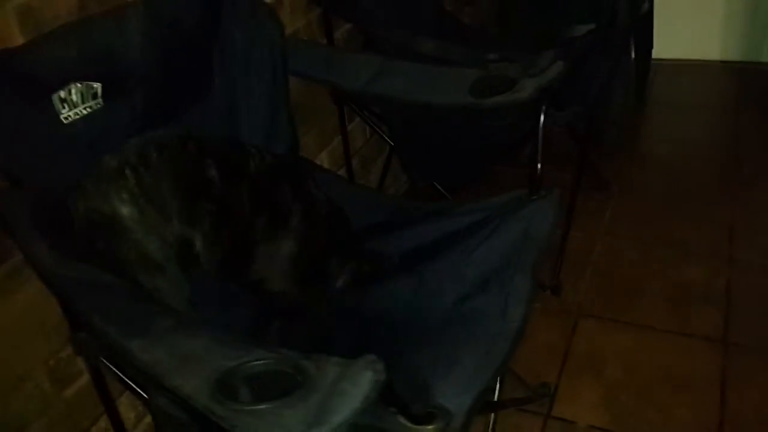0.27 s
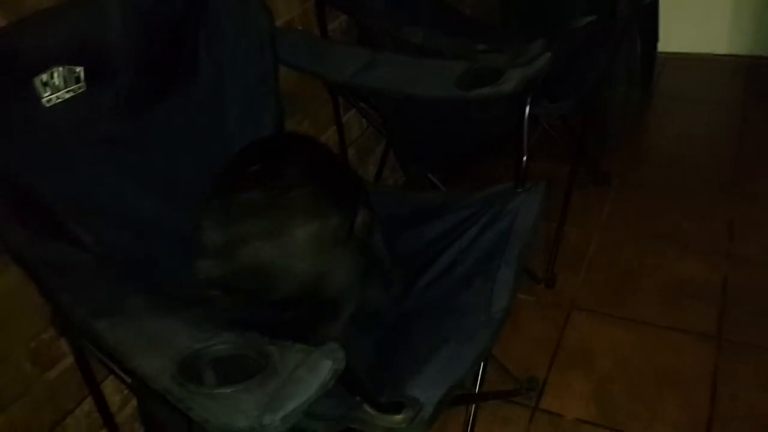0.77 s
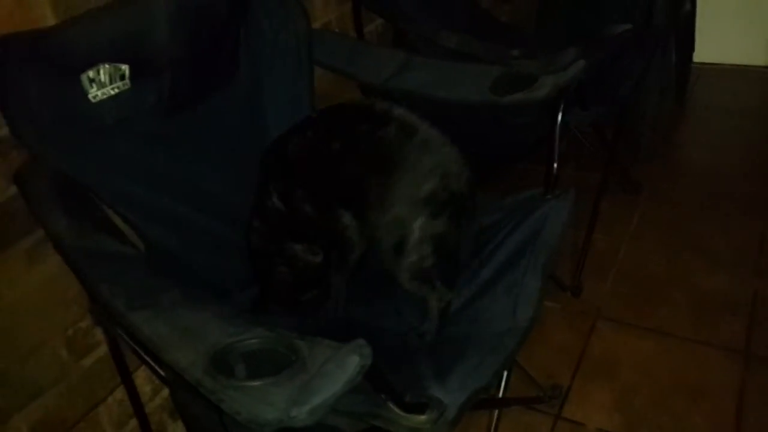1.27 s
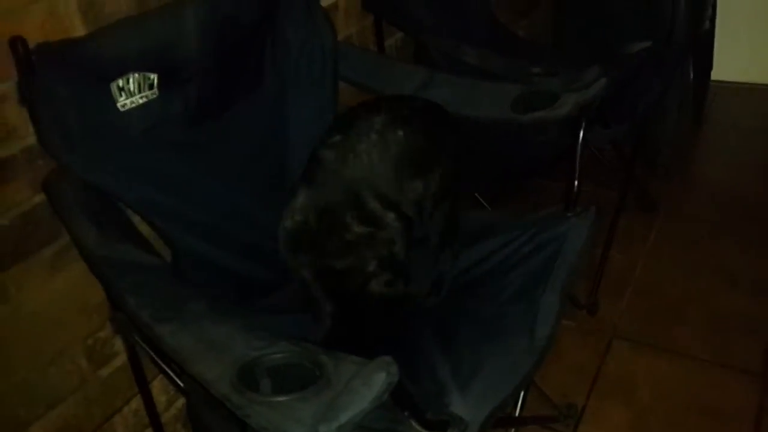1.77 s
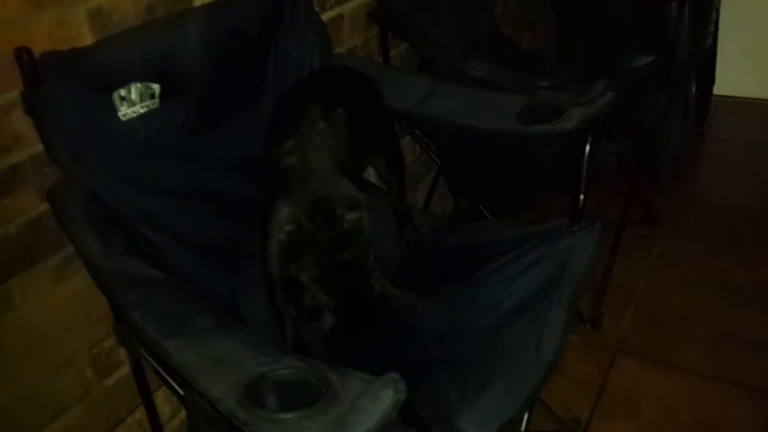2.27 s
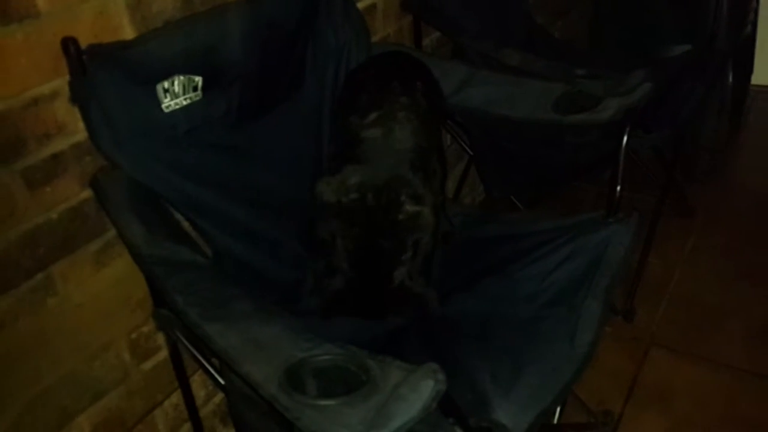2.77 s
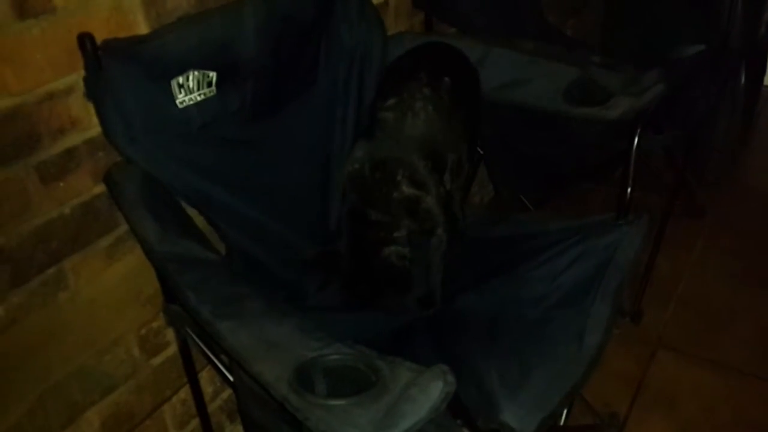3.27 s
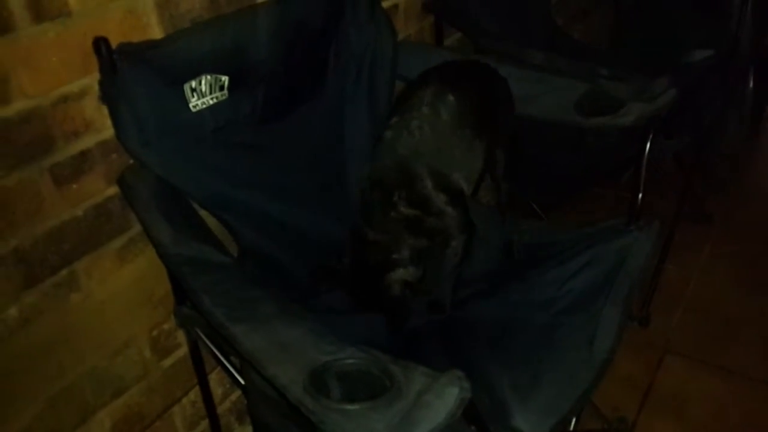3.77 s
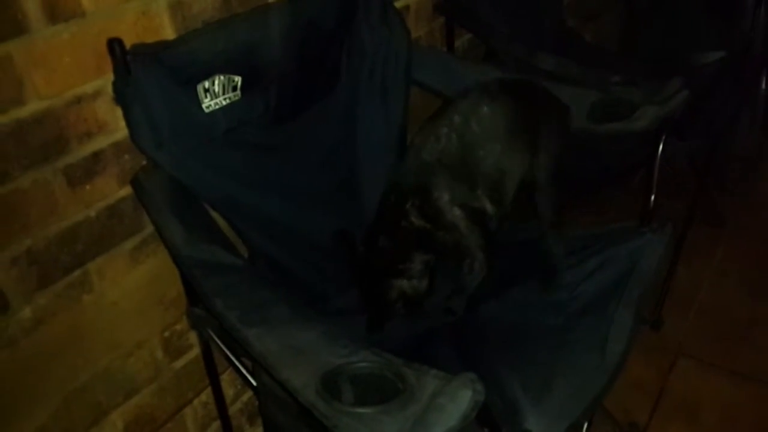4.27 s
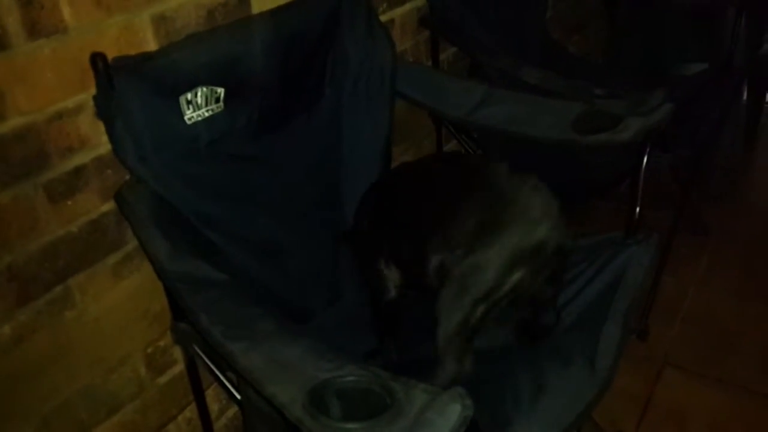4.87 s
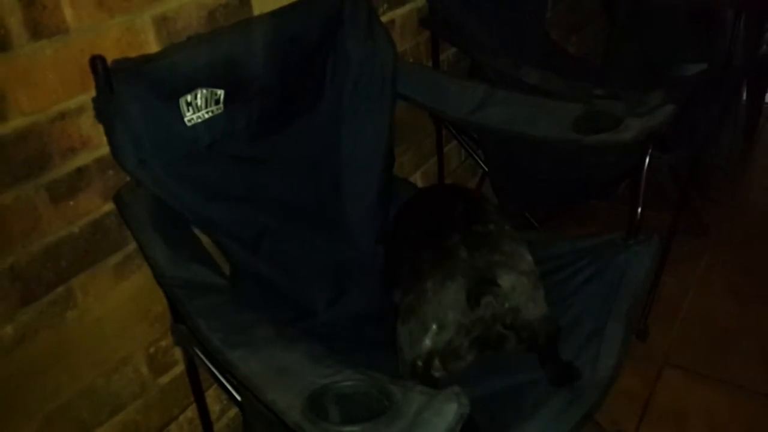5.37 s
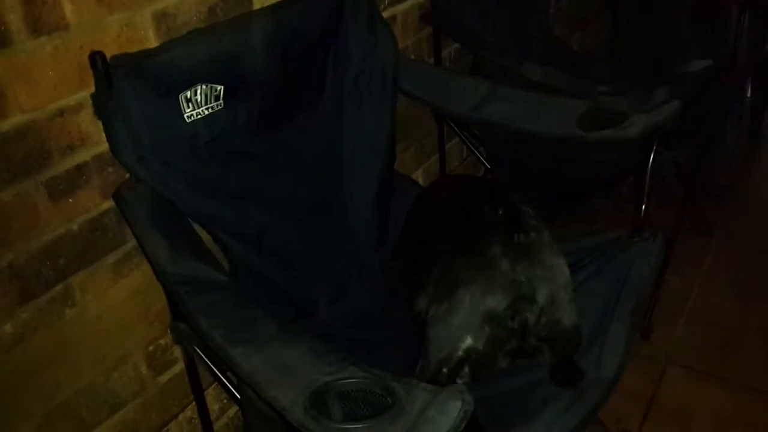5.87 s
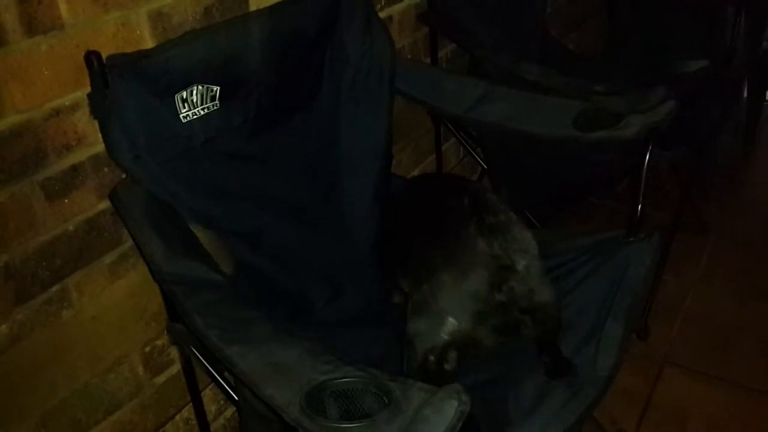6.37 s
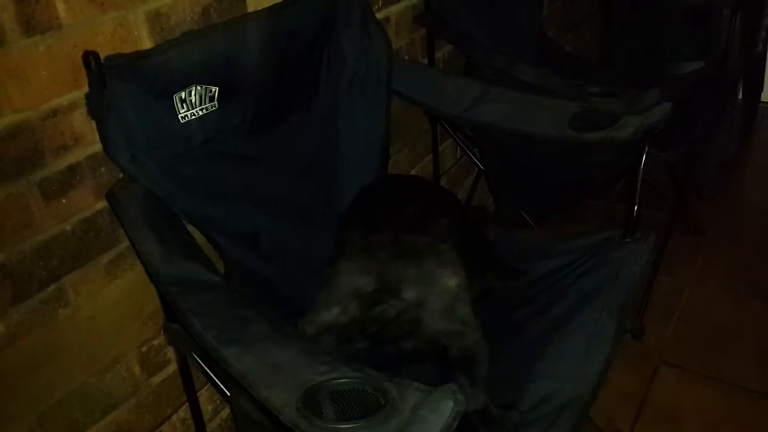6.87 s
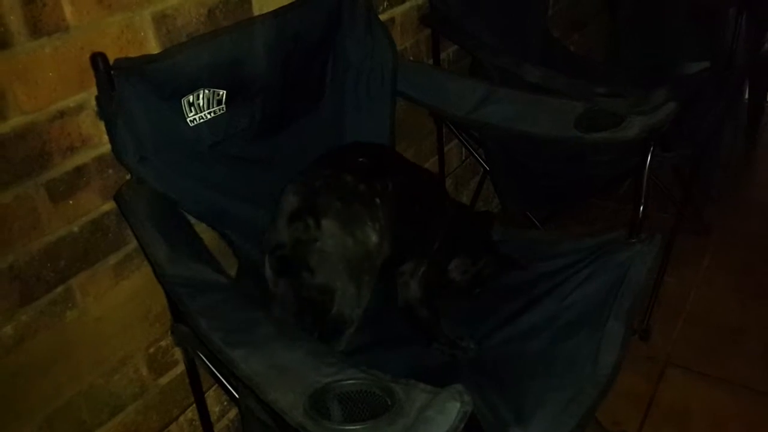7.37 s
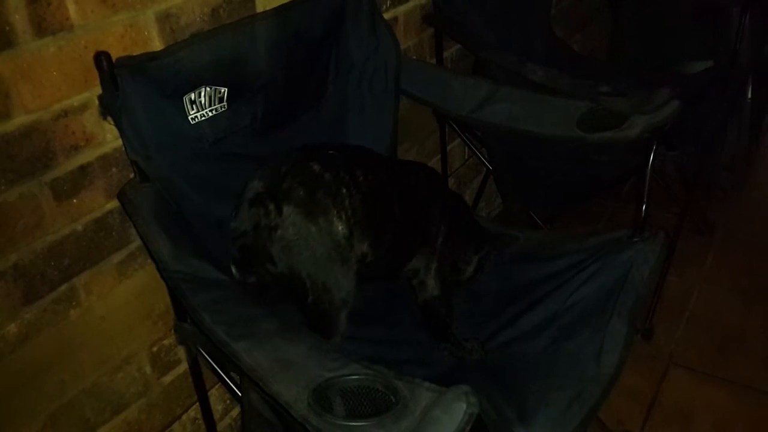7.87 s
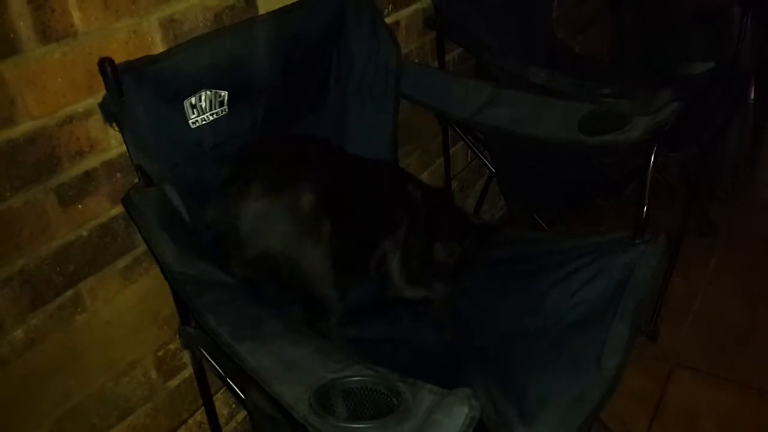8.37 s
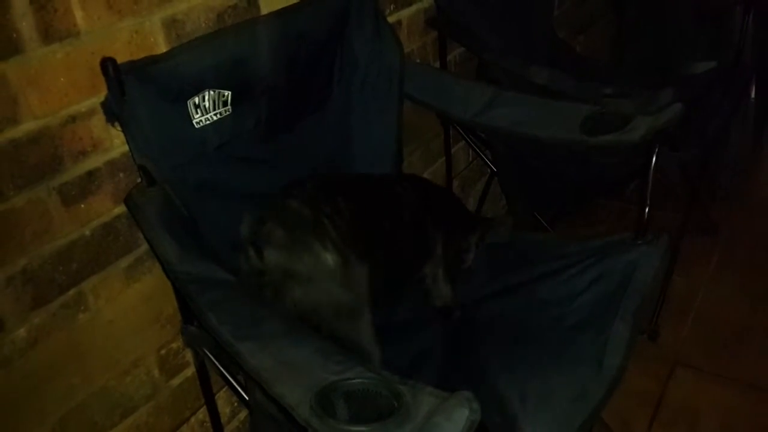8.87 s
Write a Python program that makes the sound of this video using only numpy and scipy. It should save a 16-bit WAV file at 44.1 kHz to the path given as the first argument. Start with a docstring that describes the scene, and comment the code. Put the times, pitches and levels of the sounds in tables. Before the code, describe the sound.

Close by in a quiet room, a small dog paws unevenly at a folding chair's taut nylon seat, snorting and sneezing between strokes. The cloth rustles, the seat thuds softly and claws catch with sharp ticks. Then comes a run of fast scratches that zip across the weave, a few looser scrapes and knocks, and a last short burst of zipping digs.

```python
"""Paws hiss over taut nylon: a small dog digs at a folding chair's seat, close to the microphone in a
tiled room. The panel rasps and the seat thuds like a slack drum under each push. Fast claws zip across
the weave, snag and tick, and between strokes the dog snorts and sneezes through its short muzzle.
The tiles add a brief echo to claws, taps and snorts; faint room tone lies behind."""
import sys
import numpy as np
from scipy import signal
from scipy.fft import rfft, irfft, next_fast_len
from scipy.io import wavfile
from scipy.ndimage import uniform_filter1d, map_coordinates

SR = 44100
rng = np.random.default_rng(int(sys.argv[2]) if len(sys.argv) > 2 else 0)


def inscribe(sig):
    """Save sig as 16-bit PCM at rate SR to the path in sys.argv[1].

    A 1-D sig is mono; a 2-D sig holds one channel per row.
    Samples are clipped to [-1, 1] before scaling.
    """
    pcm = np.round(np.clip(np.atleast_2d(sig).T, -1, 1) * 32767)
    wavfile.write(sys.argv[1], SR, pcm.astype(np.int16))


N = 402633

# paw strokes: (start [s], length [s], hiss of the pads [dB], push into the seat [dB])
PAW_STROKES = [(0, 0.061, -27, -50.5), (0.279, 0.092, -31.5, -37), (0.382, 0.16, -42, -43.5),
               (0.837, 0.016, -48, -47), (0.966, 0.074, -47.5, -55), (1.214, 0.019, -56.5, -56.5),
               (1.283, 0.012, -57, -55), (1.382, 0.018, -44.5, -59.5), (1.55, 0.15, -45.5, -54.5),
               (1.751, 0.089, -33, -61), (2.008, 0.057, -27.5, -33.5), (2.187, 0.078, -37, -34.5),
               (2.513, 0.12, -25.5, -29), (3.16, 0.075, -35, -53), (3.254, 0.053, -28, -42),
               (3.707, 0.084, -30.5, -55), (3.836, 0.11, -29, -47.5), (3.984, 0.071, -37, -43),
               (4.415, 0.022, -26, -35), (4.49, 0.25, -43.5, -46), (4.612, 0.26, -37, -44),
               (4.914, 0.028, -22.5, -44), (5.086, 0.14, -68, -38.5), (5.248, .12, -32.5, -52),
               (5.488, 0.022, -23.5, -31.5), (5.568, 0.082, -24.5, -38), (5.755, 0.053, -27, -35),
               (5.903, 0.056, -25.5, -52.5), (6.042, 0.098, -30.5, -41.5), (6.184, 0.075, -21.5, -36.5),
               (6.334, 0.089, -25, -31.5), (6.462, 0.085, -21.5, -34.5), (6.619, 0.083, -23, -32),
               (6.786, 0.098, -29.5, -35.5), (6.946, 0.096, -30, -51), (7.12, 0.22, -54, -48.5),
               (7.289, 0.024, -29, -44), (7.494, 0.15, -36, -55), (7.683, 0.02, -31, -40),
               (7.974, 0.11, -39.5, -45), (8.118, 0.085, -57, -43), (8.256, 0.17, -30, -44.5),
               (8.556, 0.11, -29, -29.5), (8.767, 0.058, -23, -32), (8.865, 0.064, -22.5, -30.5),
               (9.013, 0.12, -40, -35.5)]


def digging():
    """Pads hiss on the nylon, the panel rasps, and the loaded seat thuds in lumps just after."""
    # the seat shifts under the dog's weight: (time [s], rustle [dB], low creep [dB])
    weight = [(0, -39.5, -43), (.2, -57, -56), (0.799, -64, -54.5), (1.5, -55.5, -59), (1.7, -41.5, -43),
              (2.299, -45, -47), (2.95, -33, -35.5), (3.1, -34, -34.5), (3.4, -47, -51.5), (3.9, -43, -42),
              (4.17, -58.5, -58.5), (4.5, -44, -48), (6.8, -40.5, -37.5), (7.2, -52, -53),
              (7.7, -48, -44.5), (7.82, -66, -61.5), (7.93, -67, -67), (8.1, -50.5, -50.5),
              (9.13, -29, -30.5)]
    # spectra of pads, panel and seat: (frequency [Hz], density [dB])
    pads = [(1470, -24), (2500, -10.5), (3150, -14), (4690, -4.5), (7700, -7.5), (11600, -18.5),
            (15000, -30)]
    panel = [(400, -15), (700, 1.5), (1200, 1), (2200, -3), (3200, -8), (4500, -23)]
    seat = [(18, -53), (30, -29), (162, -3), (322, -7.5), (397, -5), (700, -11.5), (910, -19), (1540, -120)]
    _, _, hiss_db, push_db = np.transpose(PAW_STROKES)
    times, rustle_db, creep_db = np.transpose(weight)
    rustle, creep = (amp(np.interp(np.arange(N) / SR, times, db)) for db in (rustle_db, creep_db))
    hiss = paw_pressure(hiss_db, lag=0, rise=930, fall=605) + rustle
    rasp = paw_pressure(push_db + 2, lag=-0.0051, rise=1250, fall=620) + amp(-2) * rustle
    thud = paw_pressure(push_db - 0.5, lag=0.011, rise=650, fall=980) + creep
    smooth = patchy_noise(depth_db=2.1) * amp(2.2 * wobble(500))
    pops = crinkles()
    grainy = patchy_noise(depth_db=2.2) * amp(2 * wobble(150)) * pops
    lumpy = rng.standard_normal((2, N)) * amp(3.1 * wobble(60)) * pops
    return hiss * spread(smooth, pads) + rasp * spread(grainy, panel) + thud * spread(lumpy, seat)


def paw_pressure(levels_db, lag, rise, fall):
    """Each stroke presses, holds and lets go; lag in s, rise and fall in dB/s."""
    out, t = np.zeros(N), np.arange(N) / SR
    for (start, length, *_), db in zip(PAW_STROKES, levels_db):
        span = slice(max(round((start - .2) * SR), 0), round((start + .5) * SR))
        age = t[span] - start - lag
        out[span] += amp(db) / (1 + amp(-rise * age) + amp(fall * (age - length)))
    return out


def crinkles():
    """Creases of the stiff cloth pop at random: brief jumps in gain, a few of them large."""
    pops = (rng.random(N) < 28 / SR) * amp(4 * rng.exponential(size=N).clip(0, 2))
    return 1 + signal.lfilter([1.1], [1, -.99], pops)


def claw_zips():
    """Each thread plucks the claw once, so pitch follows paw speed; two claws grip and skip."""
    # claw drags: (start [s], time to full speed [s], length [s], thread rate at full speed [Hz],
    # level [dB], unevenness of the threads [0-1])
    drags = [(5.242, 0.11, 0.14, 2553, -23, .08), (5.454, 0.08, 0.094, 2593, -18.5, .1),
             (5.538, 0.094, 0.13, 4596, -21, .09), (5.722, 0.078, 0.11, 2925, -24, 0.1),
             (5.854, 0.14, 0.11, 3730, -21.5, .07), (6.022, 0.068, 0.1, 2625, -18, 0.04),
             (6.139, 0.12, 0.14, 3600, -18.5, .09), (6.302, 0.052, 0.085, 1702, -16.5, 0.09),
             (6.354, 0.057, 0.082, 2190, -23, .06), (6.443, 0.055, 0.11, 4790, -15.5, 0.11),
             (6.602, 0.11, 0.092, 4930, -15, .04), (8.576, 0.055, 0.062, 2160, -18.5, 0.05),
             (8.743, 0.07, 0.094, 2382, -10, 0.04), (8.841, 0.0149, 0.036, 757, -18, 0.06),
             (8.854, 0.1, 0.076, 5250, -13.5, .07), (9.049, 0.052, 0.074, 2470, -17, 0.07)]
    out = np.zeros(N + SR)
    for start, reach, length, top_hz, db, uneven in drags:
        n = round(length * SR)
        t = np.arange(n) / SR
        speed = np.sin(np.pi / 2 * np.minimum(t / reach, 1))
        grip = np.sin(np.pi * t / length) ** .6 * speed ** .7
        for pitch, claw_db, slack in ((1, -3, 1), (.8, -7, 3)):  # leading claw, then a duller one
            hz = pitch * top_hz * speed * (1 + slack * uneven * wobble(900, n))
            phase = 2 * np.pi * np.cumsum(hz) / SR
            skips = unit(amp(4 * wobble(250, n) + 4.5 * wobble(70, n)))
            tone = np.sin(phase) + .15 * np.sin(2 * phase)
            out[round(start * SR):][:n] += amp(db + claw_db) * grip * skips * tone
    return out[:N]


def snorts():
    """Air bursts through the nose; as the muzzle moves, its resonances swell or fade and one slides."""
    # puffs of each snort, sneeze or sniff: (start [s], rise [s], hold [s], level [dB], fall [dB/s])
    breaths = [
        [(0.467, 0.002, 0.089, -13, 193)],
        [(2.792, 0.09, 0.0093, -11.5, 180)],
        [(2.969, 0.0042, 0.0074, -13.5, 510), (2.994, 0.011, 0.002, -13, 906),
         (3.018, 0.012, 0.0029, -18.5, 446)],
        [(3.611, 0.029, 0.0028, -18.5, 1198)],
        [(4.589, 0.0048, 0.073, -17, 177)],
        [(5.121, 0.0037, 0.09, -12, 1302.5), (5.22, 0.0035, 0.012, -28.5, 81)],
        [(3.826, 0.028, 0.056, -27, 500)],
        [(4.966, 0.063, 0.025, -30.5, 210.5)],
        [(7.501, 0.065, .01, -27, 276)],
        [(4.232, 0.091, 0.079, -42, 297)],
    ]
    # muzzle resonances of each: (frequency [Hz], width [Hz], level [dB], change as it moves [dB])
    muzzles = [
        [(940, 360, 4.5, -2.5), (1850, 500, -3, -11), (2570, 760, -7.5, 7), (3790, 760, -2.5, -5.5),
         (5200, 2960, -11, 2)],
        [(1040, 900, 7.5, -10), (2216, 220, -5.5, 7), (3710, 1200, -8.5, 3), (6330, 1100, -6.5, 0.5)],
        [(1118, 165, -5, 8.5), (1545, 230, 1, -21), (2800, 230, -5.5, -11), (6880, 1250, -11, -4)],
        [(888, 10.6, 12.5, 0.5), (1370, 330, -4, -11), (4430, 850, -17.5, -6), (7540, 1500, -10.5, -8)],
        [(849, 123, 9.5, -5.5), (500, 340, -4, 6.5), (1750, 370, 0.5, -21), (3410, 680, -22.5, 8.5),
         (6240, 660, -17.5, 9.5)],
        [(1200, 520, 3.5, -0.5), (1880, 170, -3, 10), (3580, 640, -5.5, -3), (6130, 1200, -10.5, 2.5),
         (7870, 1600, -6.5, -21)],
        [(4740, 420, 0, -1)],
        [(9000, 1000, 0, -20)],
        [(4940, 540, -16, 4), (7950, 3200, -4, -22), (10130, 1200, 0.5, -16)],
        [(7300, 1600, 0, -4), (9900, 900, -1, -2)],
    ]
    # slide of each muzzle's first resonance: (end over start frequency [ratio])
    slides = [0.7, 1.15, 1.1, 0.84, 1.02, 0.93, 0.9, 0.74, 1.01, 1.3]
    out, n, move_s = np.zeros(N), SR // 2, 0.12
    for puffs, muzzle, slide in zip(breaths, muzzles, slides):
        t = puffs[0][0] + np.arange(n) / SR
        gusts = amp(1.04 * wobble(308.5, n))
        moved = np.clip((t - t[0]) / move_s, 0, 1)
        blow = lambda hz, width: filtered(gusts * rng.standard_normal(n), nose_resonance(hz, width))
        swell = lambda db, change: amp(db + change * moved + 2 * wobble(30, n))
        (hz, width, db, change), *others = muzzle
        # the slide is a crossfade through three bands
        fade = lambda k: np.sqrt(np.clip(1 - np.abs(2 * moved - 1 - k), 0, 1))
        breath = swell(db, change) * sum(fade(k) * blow(hz * slide ** (k / 2), width) for k in (-1, 0, 1))
        breath += sum(swell(db, change) * blow(hz, width) for hz, width, db, change in others)
        effort = np.zeros(n)
        for start, rise, hold, db, fall in puffs:
            attack = np.clip((t - start) / rise, 0, 1) ** 2
            effort += attack * amp(db - fall * np.clip(t - start - rise - hold, 0, 1))
        out[round(t[0] * SR):][:n] += effort * breath / breath[:SR // 6].std()
    return out


def nose_resonance(hz, width):
    """One steep resonance, with no bass: a small nose does not radiate it."""
    def response(f):
        peak = 1j * f * width / (hz * hz - f * f + 1j * f * width)
        low_cut = (1j * f / (450 + 1j * f)) ** 2
        return peak * np.abs(peak) ** 0.7 * low_cut / (1 + (f / 10500) ** 8)
    return response


def snags_and_taps():
    """A snagged claw cracks and knocks the seat; a paw tap is a deeper knock alone."""
    # claw snags and frame ticks: (time [s], level [dB])
    snags = [(1.196, -42), (1.674, -20.5), (2.184, -22), (2.377, -24), (2.687, -20.5), (2.751, -12),
             (3.119, -21), (3.54, -36), (3.823, -21.5), (4.778, -21), (5.707, -17), (7.244, -16.5),
             (7.448, -26.5), (7.951, -29), (7.987, -16.5), (8.454, -23), (2.254, -21), (5.1, -30)]
    # spectrum of the crack: (frequency [Hz], density [dB])
    claw = [(300, 11.5), (900, 11), (3000, 5.5), (6000, 6.5), (10000, -21), (15000, -56)]
    # paw taps that pop the taut seat: (time [s], level [dB])
    taps = [(0.433, -22.5), (1.987, -21), (2.007, -22), (2.154, -24), (2.213, -13.5), (2.23, -10.5),
            (2.19, -15), (2.416, -17), (3.121, -16), (3.227, -16), (5.043, -21), (5.377, -24),
            (6.123, -20.5), (6.555, -29), (6.807, -11.5), (7.301, -25.5), (7.487, -27), (7.697, -16),
            (7.725, -25), (8.308, -14.5), (7.628, -30)]
    out, t = np.zeros(N + SR), np.arange(SR // 20) / SR
    for start, db in snags:
        noise = unit(filtered(rng.standard_normal(len(t)), lambda hz: amp(along(claw, hz))))
        crack = amp(db - 1) * noise * amp(-60 * t / .013)
        knock = amp(-21.5 + 0.26 * db) * seat_knock(t)  # grows less than the crack
        out[round(start * SR):][:len(t)] += crack + knock
    for start, db in taps:
        attack = 1 - np.exp(-t / 0.00059)
        out[round(start * SR):][:len(t)] += amp(db) * attack * seat_knock(0.86 * t)
    return out[:N]


def seat_knock(t):
    """Two short drum modes of the seat, pitched by where it happens to be struck."""
    hz = 480 * amp(rng.normal(0, 1.3))
    phase = 2 * np.pi * hz * t
    return amp(-60 * t / .025) * (np.sin(phase) + .6 * np.sin(1.7 * phase))


def tile_echo(x):
    """The tiled room answers in stereo, each frequency dying at its own speed."""
    # decay off the tiles: (frequency [Hz], time to fall 60 dB [s])
    tiles = [(200, 0.081), (2000, 0.14), (10000, 0.11)]
    hz, t, bands = signal.stft(rng.standard_normal((2, SR // 2)), SR, nperseg=256)
    tail = signal.istft(bands * amp(-60 * t / along(tiles, hz)[:, None]), SR, nperseg=256)[1]
    delayed = np.pad(x, (150, 0))[None]
    return signal.fftconvolve(delayed, tail / np.linalg.norm(tail[0]), axes=1)[:, :N]


def room_tone():
    """The quiet room: a steady low rumble and a thin hiss."""
    # spectrum of the room: (frequency [Hz], density [dB])
    air = [(24, -27), (40, 5), (125, -27), (200, -4), (568, -54), (5040, -16.5), (15000, -31)]
    return amp(-56.5) * spread(rng.standard_normal((2, N)), air)


def spread(pair, spectrum):
    """Two noises coloured and blended to stereo at rms 1: bass central, treble wide."""
    # likeness of left and right: (frequency [Hz], correlation [0-1])
    alike = [(60, 0.86), (240, 0.97), (950, 0.69), (3770, 0.042), (15000, 0.031)]
    angle = lambda hz: np.arccos(np.clip(along(alike, hz), -1, 1)) / 2
    blend = lambda hz: amp(along(spectrum, hz)) * [np.cos(angle(hz)), np.sin(angle(hz))]
    mid, side = filtered(pair, blend)
    return unit(np.array([mid + side, mid - side]))


def patchy_noise(depth_db):
    """Stereo white noise whose gain varies in patches of time and frequency."""
    bands = signal.stft(rng.standard_normal((2, N)), nperseg=256)[2]
    patches = uniform_filter1d(rng.standard_normal(bands.shape[1:]), size=4, axis=0)
    patches = uniform_filter1d(patches, size=24, axis=1)
    return signal.istft(bands * amp(depth_db * unit(patches)), nperseg=256)[1][:, :N]


def amp(db):
    """Gain of a level in dB."""
    return 10 ** (np.asarray(db) / 20)


def unit(x):
    """Scaled to rms 1."""
    return x / np.sqrt(np.mean(x ** 2) + 1e-20)


def along(points, hz):
    """Interpolates (Hz, value) points on a log axis."""
    f, v = np.transpose(points)
    return np.interp(np.log(hz + 1), np.log(f + 1), v)


def wobble(rate, size=N):
    """A smooth random curve, rate knots a second."""
    return map_coordinates(rng.standard_normal(int(size * rate / SR) + 4), [np.arange(size) * rate / SR])


def filtered(x, response):
    """x through a frequency response."""
    m = next_fast_len(x.shape[-1] + 8192)
    return irfft(rfft(x, m) * response(np.fft.rfftfreq(m, 1 / SR)), m)[..., :x.shape[-1]]


def scene():
    """Claws and snorts up close with their echo, over the digging and the room tone."""
    near = claw_zips() + snorts() + snags_and_taps()
    background = room_tone()
    return amp(-1.5) * near + amp(-4.5) * tile_echo(near) + digging() + background


def record(dry):
    """Two microphone ports of unlike colour, the left a little farther off; loud bursts duck the bass."""
    # colour of the ports: (frequency [Hz], left minus right [dB])
    ports = [(100, 0.5), (400, 2), (2500, 2), (5500, 7), (7000, 0.5), (9000, -10.5), (15000, -8)]
    side = np.array([[.5], [-.5]])
    lag_s, duck_db, top_hz = 7e-5, -16.5, 14600
    delay = lambda hz: np.exp(-2j * np.pi * hz * lag_s * side / (1 + (hz / 6000) ** 2))
    low_cut = lambda hz: (1j * hz / (45 + 1j * hz)) ** 2
    x = filtered(dry, lambda hz: amp(side * along(ports, hz)) * delay(hz) * low_cut(hz))
    x = x / (1 + np.abs(x / .9) ** 4) ** (1 / 4)  # peaks round off
    bass = filtered(x, lambda hz: 1 / (1 + (hz / 380) ** 6))
    upper = x - bass
    power = np.abs(uniform_filter1d(np.mean(upper ** 2, axis=0), size=2000))
    ducked = bass / (1 + (power / amp(duck_db) ** 2) ** 2)
    return filtered(upper + ducked, lambda hz: hz < top_hz)


dry = scene()
out = record(dry)
inscribe(out)
```